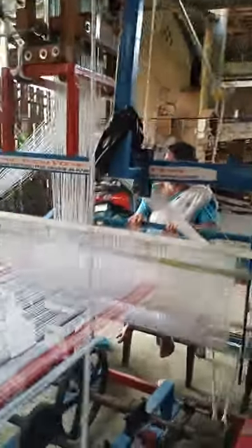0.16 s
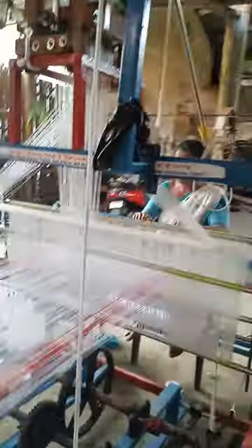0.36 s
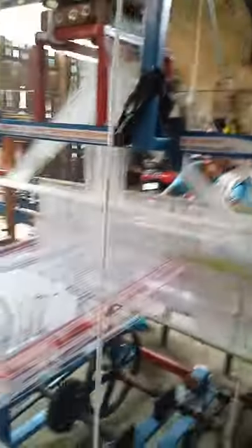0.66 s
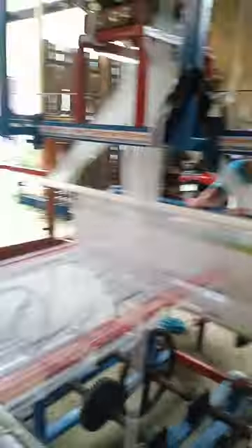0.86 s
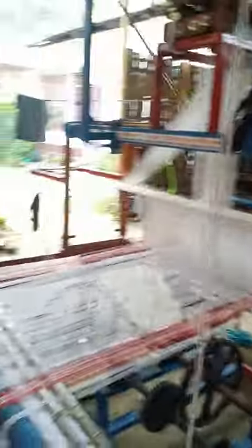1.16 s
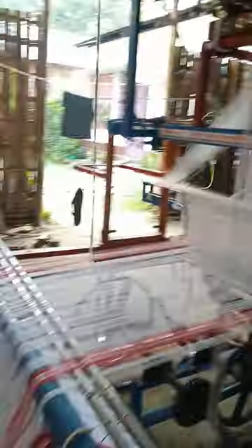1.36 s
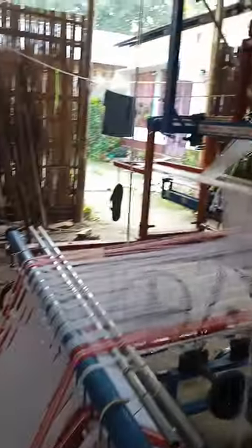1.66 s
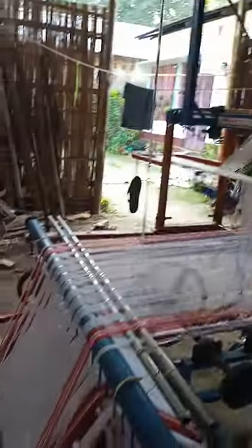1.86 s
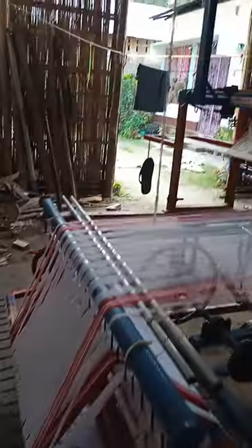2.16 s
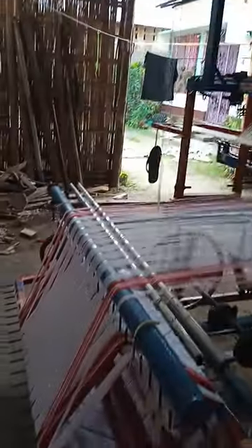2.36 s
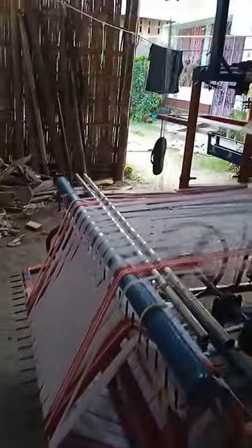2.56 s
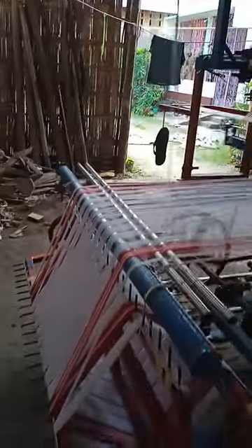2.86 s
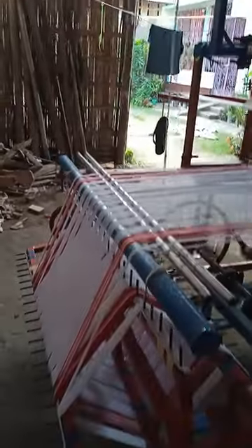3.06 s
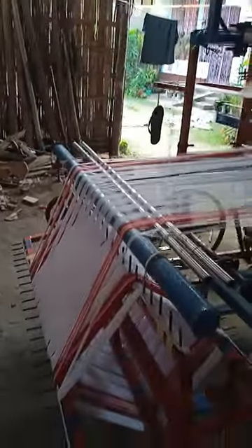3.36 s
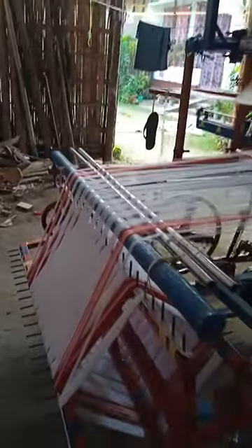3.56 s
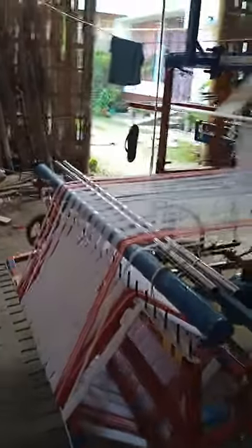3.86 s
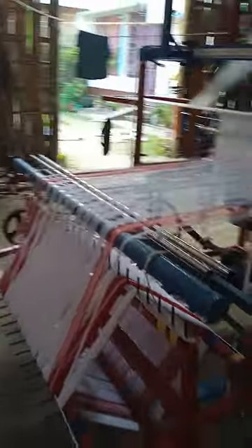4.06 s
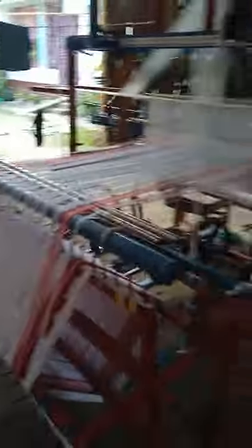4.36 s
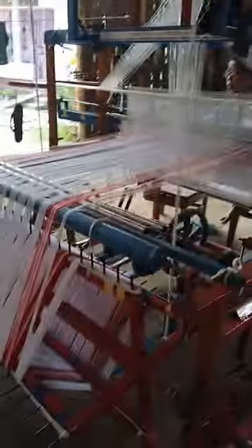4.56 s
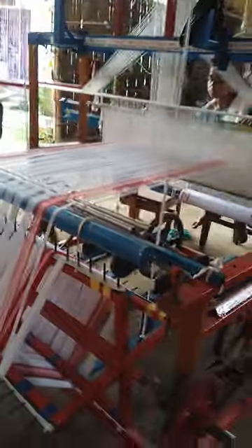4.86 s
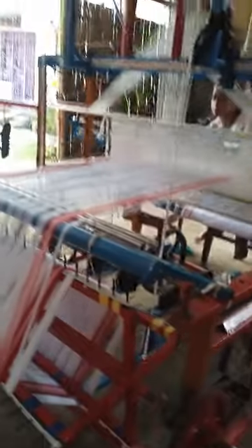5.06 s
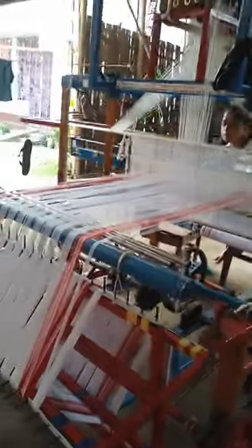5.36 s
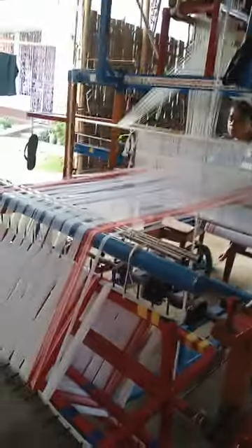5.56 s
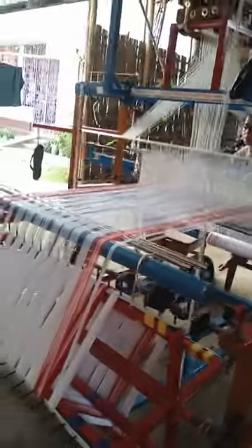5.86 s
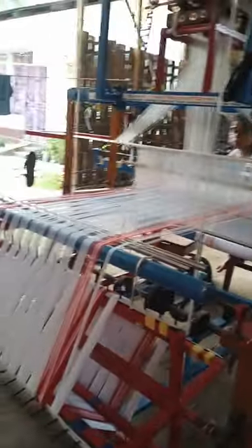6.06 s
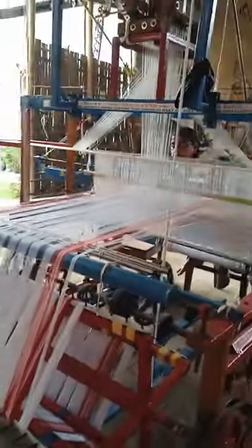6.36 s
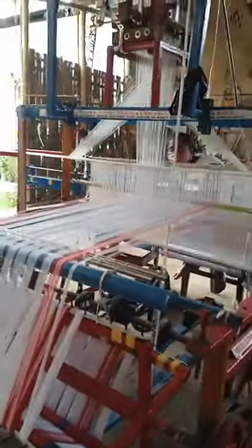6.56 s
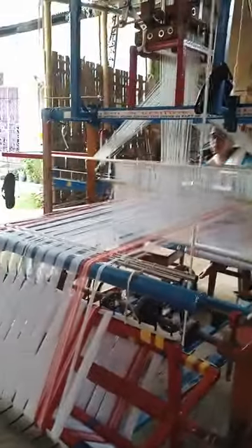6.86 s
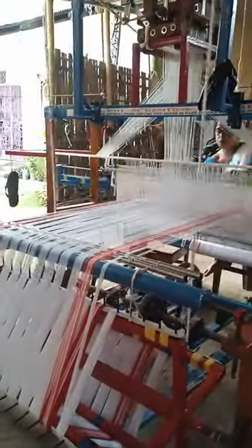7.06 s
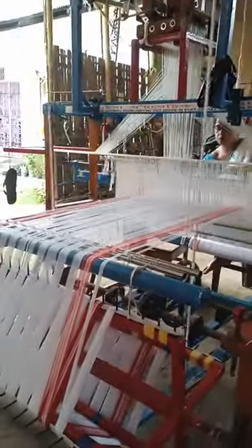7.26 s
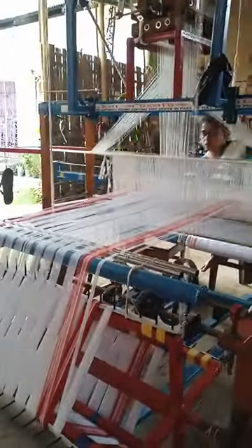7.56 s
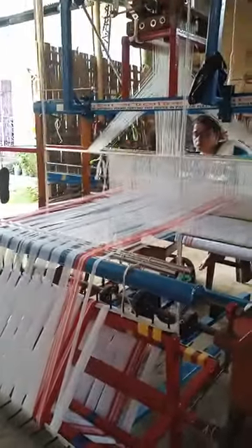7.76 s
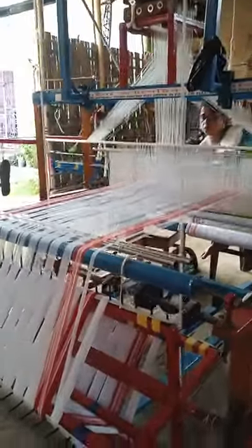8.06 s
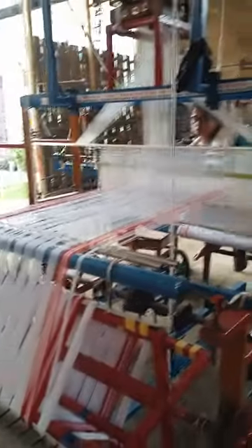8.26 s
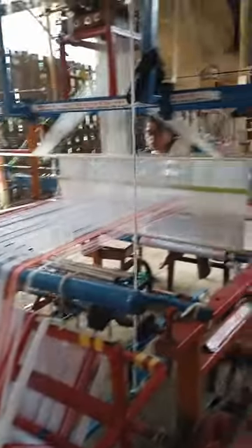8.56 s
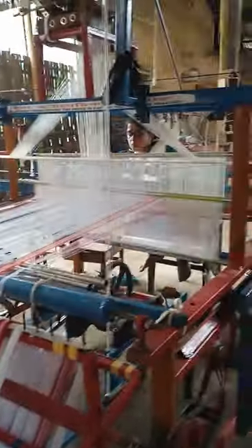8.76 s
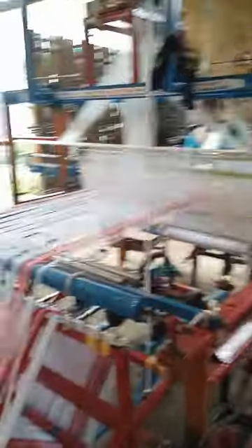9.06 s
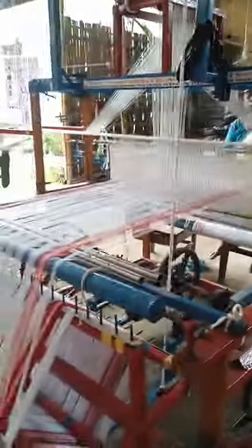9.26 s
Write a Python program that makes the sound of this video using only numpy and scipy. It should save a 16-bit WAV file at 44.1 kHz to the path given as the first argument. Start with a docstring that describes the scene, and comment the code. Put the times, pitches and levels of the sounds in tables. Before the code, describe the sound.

Continuous, fast, uneven clattering of wood, iron and thin wires, heard very near and centred. Each roughly one-second cycle runs shuttle throw, rattle and catch, loose heddles, lever clank, heavy beat with spilling hooks, bright lift. Shuttle hits weaken in the later part, while low thuds become more frequent. Short shed echo, soft distant loom wash, and a few dull bumps on the hand-held microphone.

```python
"""Handlooms in a bamboo shed

Handlooms with punched-card heads work near a hand-held microphone. Strokes are bursts of random tiny impacts
that shake wood, levers, wires and fine ticks; about once a second a head drops a shower of wire hooks.
Short decaying tones add pings and one hard tick, and fading noise makes the shed's echo.
Pulsing noise stands for farther looms, and short pushes bump the microphone."""
import sys
import numpy as np
from scipy import signal
from scipy.fft import rfft, irfft, next_fast_len
from scipy.io import wavfile
from scipy.ndimage import map_coordinates

SR = 44100
rng = np.random.default_rng(int(sys.argv[2]) if len(sys.argv) > 2 else 0)


def wav_out(sig):
    """Save sig, one row per channel (or a flat mono array), as 16-bit PCM at SR to the path in sys.argv[1]."""
    wavfile.write(sys.argv[1], SR, np.round(np.clip(np.atleast_2d(sig).T, -1, 1) * 32767).astype(np.int16))


N = 414981
LEAD_S = 0.02  # each burst starts this long before its stroke lands


def amp(db):
    """Turn decibels into a gain."""
    return 10 ** (np.asarray(db) / 20)


def unit(x):
    """Scale to an rms level of 1."""
    return x / np.sqrt(np.mean(np.abs(x) ** 2) + 1e-20)


def along(points, hz):
    """Read a curve of (Hz, value) points on a logarithmic pitch axis."""
    point_hz, values = np.transpose(points)
    return np.interp(np.log(hz + 1), np.log(point_hz), values)


def filtered(x, response):
    """Shape the spectrum of x by a response that depends on frequency."""
    size = x.shape[-1]
    padded = next_fast_len(size + SR // 4)
    spectrum = rfft(x, padded) * response(np.fft.rfftfreq(padded, 1 / SR))
    return irfft(spectrum, padded)[..., :size]


def add(track, s, sound):
    """Mix a sound into a track at s seconds, cutting off what falls outside."""
    start = round(s * SR)
    sound = sound[max(0, -start):]
    part = track[max(0, start):][:len(sound)]
    part += sound[:len(part)]


def wobble(size, rate):
    """Draw a smooth random curve through rate random points a second."""
    knots = np.arange(size) / SR * rate
    return map_coordinates(rng.standard_normal(int(knots[-1]) + 4), [knots])


def resonance(f, hz, width):
    """One vibrating mode: it answers best at its own pitch, with gain 1, and only after it is struck."""
    return 1j * f * width / (hz * hz - f * f + 1j * f * width)


def ringing(f, hz, width_hz, gain_db):
    """A struck part favours its own pitch."""
    return amp(gain_db) * resonance(f, hz, width_hz)


def own_modes(size, depth_db, ring_s):
    """Random peaks and dips in the spectrum: every blow finds other modes of the loom."""
    t = np.arange(size) / SR
    # a random cepstrum with no negative times gives a response that never starts early
    cepstrum = rng.standard_normal(size) * np.exp(-t / ring_s) * (1 - np.exp(-t * SR / 20))
    log_response = unit(rfft(cepstrum)) * np.sqrt(2) * np.log(amp(depth_db))
    return unit(np.exp(log_response))


def loom_body(f):
    """The loom's broad colour and its steel modes, split into the ranges of wood, levers, wires and ticks."""
    # Ringing steel parts. Each row: pitch in Hz, level in dB against the broad body.
    steel_modes = [(613, -2), (1335, 0), (1862, -5), (2056, -5), (2271, 0), (2368, -2), (3789, -2),
                   (3929, -3), (4543, -2), (5178, -4), (5620, 0), (6449, -3), (7730, 1), (7924, 0),
                   (9593, -4), (9905, 0), (12263, 2)]
    # Broad colour of a loom. Each row: frequency in Hz, relative level in dB per Hz.
    body_curve = [(50, -39.5), (135, -24.5), (210, -26.5), (600, -15.5), (922, -16), (1350, -6.5),
                  (2250, -2.5), (3100, -7.5), (4200, -1.5), (6480, 4.5), (8450, -5), (13500, -13.5),
                  (15500, -4.5)]
    # Where wood, levers, wires and ticks sound. Each row: low edge in Hz, high edge in Hz.
    ranges = [(45, 1100), (1100, 3300), (3300, 8300), (8300, 17000)]
    steel = sum(amp(db) * resonance(f, hz, 12 + hz / 600) for hz, db in steel_modes)
    colour = amp(along(body_curve, f)) * (1 + steel)
    body = []
    for k, (low, high) in enumerate(ranges):
        gain = 1 / np.sqrt((1 + (low / (f + 1)) ** 16) * (1 + (f / high) ** 16))
        # a quarter-turn of phase between neighbours makes them add in power
        body.append(colour * gain * 1j ** (k % 2))
    return body


def contacts(size, rate, share):
    """Random tiny impacts, about rate a second, over a blur of smaller ones; share is their part of the power."""
    happens = rng.random(size) < rate / SR
    clicks = happens * rng.choice([-1, 1], size) * rng.uniform(0.82, 1, size)
    share = np.clip(share, 0, 1)
    return np.sqrt(share) * unit(clicks) + np.sqrt(1 - share) * rng.standard_normal(size)


def blow(chatter_s):
    """A part scuffs for a moment and lands, then loose pieces bounce unevenly and settle."""
    t = np.arange(SR // 3) / SR - LEAD_S
    u = np.maximum(t, 0) / max(chatter_s, .002)
    scuff = amp(-9.5 - 60 * np.abs(t) / 0.033)
    settle = np.exp(-u / 2) * (1 - np.exp(-u / 0.088))  # the tighter the blow, the faster its rise
    unevenness = amp(1.15 * wobble(len(t), rate=109))
    return contacts(len(t), rate=700, share=0.37) * unevenness * (scuff + settle)


def shower(swell_s):
    """Many hooks land in clumps over a short spread of time."""
    u = np.maximum(np.arange(SR // 3) / SR - LEAD_S, 0) / max(swell_s, .01)
    clumps = amp(0.58 * wobble(len(u), rate=90))
    return contacts(len(u), rate=800, share=0.44) * clumps * np.sqrt(u * np.exp(-u * u))


def shake(force, f, body, levels_db, lever_hz, wire_hz):
    """One force drives wood, a lever, wires and fine ticks; each gets its share of the energy."""
    size = 2 * (len(f) - 1)
    modes = own_modes(size, depth_db=4.1, ring_s=.003)
    lever = modes + ringing(f, lever_hz, width_hz=67, gain_db=2.5)
    wire = modes + ringing(f, wire_hz, width_hz=900, gain_db=2)
    drive = rfft(force, size)
    # the force behind the ticks fades sooner: later bounces are softer and lose their top
    softening = np.exp(-np.arange(len(force)) / SR / 0.22)
    hard = rfft(force * softening, size)
    driven = (drive * modes, drive * lever, drive * wire, hard * modes)
    parts = [unit(colour * part) for colour, part in zip(body, driven)]
    return irfft(amp(levels_db) @ np.array(parts), size) * np.linalg.norm(force)


def stroke(s, part, db, bright_db=0, length=None, ring_hz=None, wire_ring_hz=None, gesture=blow):
    """Gather one stroke's start, force, levels and ring pitches; brightness lifts its wires and ticks."""
    # The kinds of stroke, by name. Each row: chatter time in seconds, then relative levels
    # in dB of wood, iron lever, wires and fine ticks, then lever ring in Hz, wire ring in Hz.
    part_sounds = {"treadle": (.03, -41, -25, -28, -36, 2330, 6450),
                   "beater": (.036, -35.5, -25.5, -23.5, -29.5, 2230, 6450),
                   "hooks": (.085, -38.5, -27.5, -22.5, -30, 2170, 5800),
                   "hook bounce": (.018, -44, -34, -26, -31, 2100, 6300),
                   "lift": (.024, -44, -28.3, -22, -27.5, 2270, 6950),
                   "stop": (.018, -40, -31.5, -38, -45, 2200, 5900),
                   "cord": (.03, -54, -43, -38, -47, 2150, 6000),
                   "throw out": (.035, -50, -31.5, -27.5, -41, 2450, 6970),
                   "run out": (.04, -46, -34, -33.5, -49, 2450, 6600),
                   "catch out": (.02, -43, -24.5, -22.5, -27.5, 2300, 6640),
                   "shuttle bounce": (.021, -41, -25.5, -30, -32.5, 2150, 6400),
                   "throw back": (.02, -50, -30, -23.5, -26, 2220, 5600),
                   "run back": (.04, -47, -39.5, -41, -52, 1750, 6100),
                   "catch back": (.019, -41, -30.5, -24.5, -27.5, 2110, 6400),
                   "heddles": (.04, -46, -36, -35, -45, 2150, 6000),
                   "frame": (.028, -40, -34, -43, -54, 1600, 4600)}
    chatter_s, wood_db, lever_db, wire_db, tick_db, lever_hz, wire_hz = part_sounds[part]
    levels_db = db + np.array([wood_db, lever_db, wire_db + bright_db, tick_db + bright_db])
    force = gesture(length or chatter_s)
    return s - LEAD_S, force, levels_db, ring_hz or lever_hz, wire_ring_hz or wire_hz


def picks():
    """The shuttle is thrown across, rattles along and is caught; its two boxes sound different."""
    # Shuttle crossings, out and back in turn. Each row: start in seconds, flight time in seconds,
    # throw strength in dB, catch strength in dB, brightness in dB, box ring in Hz.
    crossings = [(.002, .146, 1.5, .5, 0, 2370), (.9, .144, 0, 1.5, -1, 2160), (1.91, .13, 1, .5, 0, 2850),
                 (2.826, .141, 1, .5, 0, 1730), (3.821, .142, .5, -2, 1, 2140),
                 (4.755, .128, 1, -1, 0, 2100), (5.862, .136, -2.5, -2.5, -2.5, 1900),
                 (6.908, .108, -21, -11, -4, 1870), (8.11, .137, -5, -3, -3, 2120),
                 (9.113, .143, -1, -4.5, -2, 2130)]
    run_s, bounce_s, cord_s = .068, .04, .07  # run after the throw, bounce after the catch, tug before the throw
    for k, (s, flight_s, throw_db, catch_db, bright_db, box_hz) in enumerate(crossings):
        way = "back" if k % 2 else "out"
        yield stroke(s, "throw " + way, throw_db, bright_db)
        yield stroke(s + run_s, "run " + way, throw_db, bright_db)
        yield stroke(s + flight_s, "catch " + way, catch_db, bright_db, ring_hz=box_hz)
        if way == "out":  # the far box bounces the shuttle
            yield stroke(s + flight_s + bounce_s, "shuttle bounce", catch_db, bright_db)
        else:  # the picking cord is tugged before the throw back
            yield stroke(s - cord_s, "cord", throw_db, bright_db)


def heddles():
    """Slack heddles rattle between strokes."""
    # Each row: start in seconds, strength in dB, brightness in dB.
    rattles = [(.28, -11, 1), (1.13, -6, -2), (1.246, 3, 5), (1.699, 0, 0), (2.225, -6, 7), (3.033, -3, 0),
               (3.168, 0, 3), (4.14, -9, 4), (5.12, 0, 5), (6.165, -13, 5), (6.555, -2, -2),
               (7.222, -11, -6), (7.294, -8, -1), (7.78, 3.5, -3), (8.405, -5, -3)]
    for s, db, bright_db in rattles:
        yield stroke(s, "heddles", db, bright_db)


def iron_clanks():
    """Iron clanks, most from treadle levers, the last a loud knock after a lift."""
    # Each row: start in seconds, strength in dB, brightness in dB, chatter time in seconds, iron ring in Hz.
    clanks = [(.386, 3.5, -3, .05, 2400), (1.226, 0, -.5, .014, 2430), (1.352, 2, -3, .032, 2730),
              (2.285, 1.5, 0, .05, 2355), (3.2, -6.5, 9.5, .029, 2080), (3.261, -1, -3, .025, 2200),
              (4.205, .5, -1.5, .09, 2340), (4.72, -4, 0, .058, 2800), (5.08, -5.5, 0, .024, 2380),
              (5.21, -5, -3.5, .11, 2160), (6.226, -2, -5, .031, 2330), (6.69, 2.5, -3.5, .011, 2315),
              (7.413, -8, 2, .045, 1970), (7.521, -1.5, -2, .046, 2320), (8.019, -2.5, 0, .014, 2480),
              (8.475, -2, -2.5, .04, 2320), (8.574, 0, -2, .025, 2350), (8.975, 1.5, -7, .015, 1950)]
    for s, db, bright_db, chatter_s, ring_hz in clanks:
        yield stroke(s, "treadle", db, bright_db, chatter_s, ring_hz)


def beats():
    """The beater drives the weft home and shakes down a shower of hooks, which bounce once."""
    # Each row: start in seconds, strength in dB, brightness in dB, hook swell time in seconds,
    # lever ring in Hz, wire ring in Hz.
    beat_list = [(.462, .5, -1, .05, 2350, 6700), (1.399, -.5, 3, .095, 2190, 5700),
                 (2.38, -.5, 2, .065, 2220, 6470), (3.311, 2.5, -1, .095, 2280, 6700),
                 (4.318, -.5, 1, .082, 2070, 6080), (5.289, 0, -.5, .11, 2160, 5640),
                 (6.388, -.5, -3.5, .05, 2110, 5950), (7.587, .5, -1.5, .11, 1630, 6200),
                 (8.634, 3, -4.5, .1, 2240, 5420)]
    hook_lag_s, hook_bounce_s = .008, .112  # after the beater
    for s, db, bright_db, swell_s, ring_hz, wire_hz in beat_list:
        yield stroke(s, "beater", db, bright_db, None, ring_hz, wire_hz)
        yield stroke(s + hook_lag_s, "hooks", db, bright_db, swell_s, ring_hz, wire_hz, gesture=shower)
        yield stroke(s + hook_bounce_s, "hook bounce", db, bright_db)


def lifts():
    """The head lifts the next threads with a bright clack, then knocks dully against its stop."""
    # Each row: start in seconds, strength in dB, brightness in dB, stop strength in dB, wire ring in Hz.
    lift_list = [(.652, 2.5, -1.5, 1, 7000), (1.641, 1, 1.5, -8, 6200), (2.58, 3, -1, 1, 7000),
                 (3.568, .5, 2, -1, 7140), (4.515, 1, .5, 1, 6980), (5.571, -.5, -1, .5, 5860),
                 (6.655, -2, -5, -1, 6680), (7.833, 0, -1, -10, 6260), (8.867, .5, -2, -9, 7400)]
    stop_s = .117  # after the lift
    for s, db, bright_db, stop_db, wire_hz in lift_list:
        yield stroke(s, "lift", db, bright_db, wire_ring_hz=wire_hz)
        yield stroke(s + stop_s, "stop", stop_db, bright_db)


def low_thuds():
    """Low, dull thuds, several of them under other strokes."""
    # Each row: start in seconds, strength in dB.
    thuds = [(2.088, -1), (4.755, 0), (5.08, -1), (5.88, -6), (6.268, 3), (7.335, -9), (7.54, 1),
             (8.15, -9), (8.58, 1), (8.875, -1), (9.256, -4)]
    for s, db in thuds:
        yield stroke(s, "frame", db)


def looms():
    """All the strokes of the weaving cycle sound through the loom's body."""
    track, f = np.zeros(N), np.fft.rfftfreq(SR // 2, 1 / SR)
    body = loom_body(f)
    for motion in picks, heddles, iron_clanks, beats, lifts, low_thuds:
        for s, force, levels_db, lever_hz, wire_hz in motion():
            add(track, s, shake(force, f, body, levels_db, lever_hz, wire_hz))
    return track


def treble_drift(x):
    """The highest treble of the strokes grows and fades slowly over time."""
    # Each row: time in seconds, gain of the highest treble in dB.
    treble_gain = [(0, -1), (1.6, -4), (2.8, -11), (4.8, -2), (6.2, 6), (7.2, 1), (9.4, -3)]
    top = filtered(x, lambda f: 1 / (1 + (13000 / (f + 1)) ** 20))
    gain_db = np.interp(np.arange(N) / SR, *np.transpose(treble_gain))
    return x + top * (amp(gain_db) - 1)


def short_tones():
    """Short decaying pairs of close tones: most are pings, the 6700 Hz one a hard tick."""
    # Each row: start in seconds, pitch in Hz, starting rms level of the main tone in dB,
    # time to fade by 60 dB in seconds.
    tone_list = [(.004, 4880, -39, .35), (1.256, 4550, -35, .3), (1.44, 5690, -30, .35),
                 (2.222, 3789, -37, .22), (2.664, 2282, -34, .64), (3.104, 5684, -33, .084),
                 (3.195, 7751, -29, .13), (3.251, 7192, -30, .17), (3.445, 5660, -26.5, .3),
                 (3.507, 7795, -31, .15), (4.215, 2368, -25.5, .33), (5.154, 4400, -33, .18),
                 (5.865, 5020, -34.5, .18), (6.390, 12270, -31, .17), (7.27, 5860, -44, .17),
                 (8.413, 5740, -27, .09), (8.885, 1327, -34, .2), (8.976, 2045, -24, .28),
                 (8.975, 6700, -12.5, .022)]
    track, t = np.zeros(N), np.arange(SR // 2) / SR
    for s, hz, db, t60 in tone_list:
        twin_hz = hz + rng.uniform(20, 53)
        twin = np.sin(2 * np.pi * (twin_hz * t + rng.random()))
        pair = np.sin(2 * np.pi * hz * t) + 0.22 * twin
        fade = amp(db + 3 - 60 * t / t60)  # 3 dB turns an rms level into a sine's peak
        add(track, s, pair * fade * (1 - np.exp(-t / .001)))
    return track


def shed(x):
    """Diffuse echo: noise that fades faster at high pitch, drawn anew each quarter second as the mic moves."""
    # Reverberation of the shed. Each row: frequency in Hz, time to fade by 60 dB in seconds.
    fade_times = [(150, 1), (2000, 0.52), (6000, 0.31), (14000, 0.17)]
    wet, step = np.zeros(N), SR // 4
    for start in range(0, N, step):
        hz, t, noise = signal.stft(rng.standard_normal(SR // 2), SR, nperseg=256)
        t60 = np.maximum(along(fade_times, hz), .05)[:, None]
        fading = noise * amp(-60 * t / t60) / np.sqrt(t60)
        tail = signal.istft(fading, SR, nperseg=256)[1]
        echo = signal.fftconvolve(x[start:start + step], tail / np.linalg.norm(tail))
        add(wet, start / SR + .005, echo)
    return wet


def far_looms():
    """Distant looms blur into a softly pulsing wash of coloured noise."""
    # The shed between blows. Each row: frequency in Hz, relative level in dB per Hz.
    far_curve = [(25, -24), (110, -17.5), (425, -12.5), (749, -10.5), (2150, -7), (2900, -14.5), (6490, -8),
                 (8270, -23), (13500, -27), (15800, -30.5)]
    wash = unit(filtered(rng.standard_normal(N), lambda f: amp(along(far_curve, f))))
    return wash * amp(-51.5 + 0.86 * wobble(N, rate=9.2))


def bumps():
    """Each bump on the microphone is one dull push and its rebound."""
    # Each row: start in seconds, peak in dB before the filter and final gain, pulse time in seconds.
    bump_list = [(3.773, -35.5, 0.0014), (4.028, -41, .0012), (5.106, -33, 0.00097),
                 (8.408, -25.5, 0.00056), (8.520, -5, 0.00017)]
    track, t = np.zeros(N), np.arange(SR // 20) / SR
    for s, db, length_s in bump_list:
        u = t / max(length_s, 1e-4)
        add(track, s, amp(db) * (1 - u) * np.exp(-u))
    dull = signal.butter(2, [60, 1100], "bandpass", fs=SR, output="sos")
    return amp(5) * signal.sosfilt(dull, track)


def scene():
    """Near looms, their echo, far looms and bumps, alike in both channels."""
    near = treble_drift(looms()) + short_tones()
    mono = near + amp(-7.5) * shed(near) + far_looms() + bumps()
    return np.array([mono, mono])


def record(dry):
    """The recorder keeps nothing above its band limit."""
    top_hz = 15900
    return filtered(dry, lambda hz: hz < top_hz)


dry = scene()
out = record(dry)
wav_out(out)
```